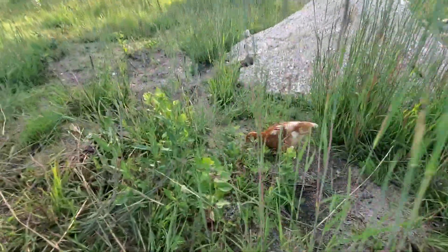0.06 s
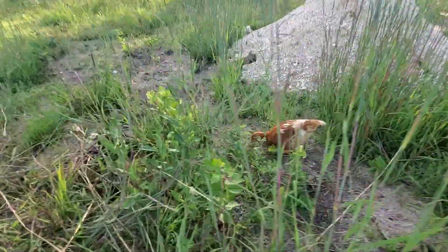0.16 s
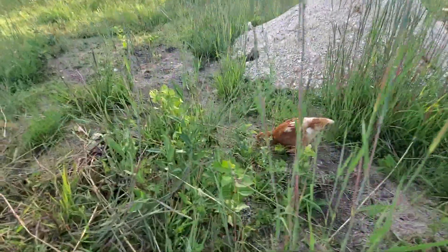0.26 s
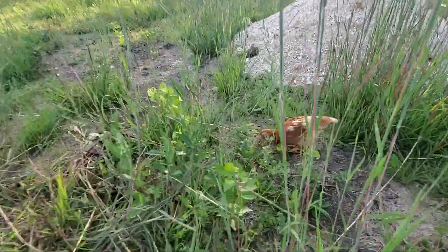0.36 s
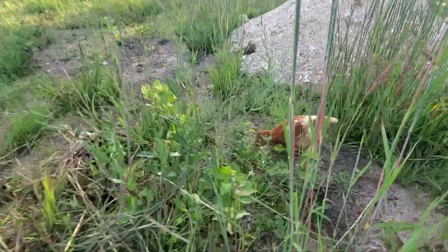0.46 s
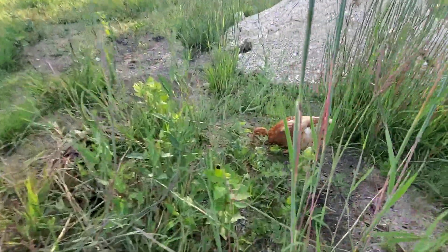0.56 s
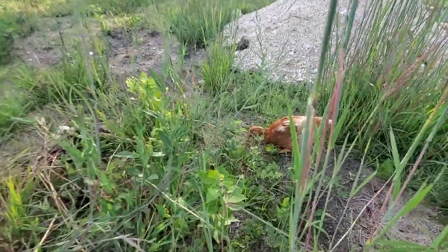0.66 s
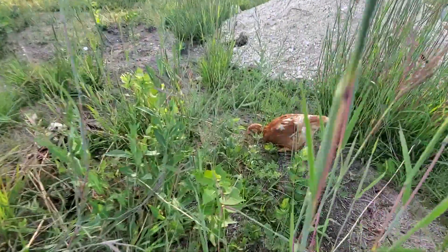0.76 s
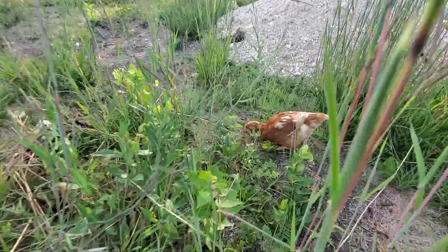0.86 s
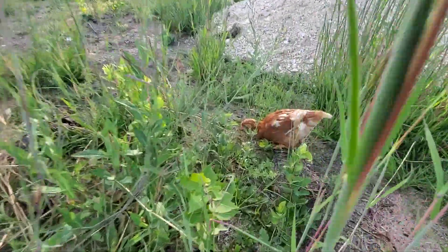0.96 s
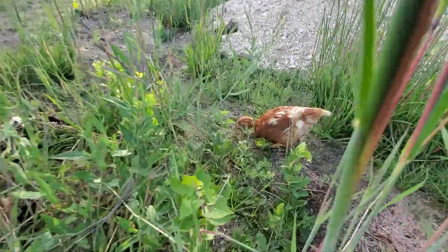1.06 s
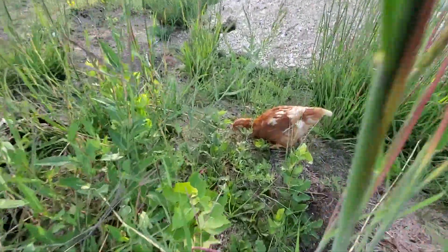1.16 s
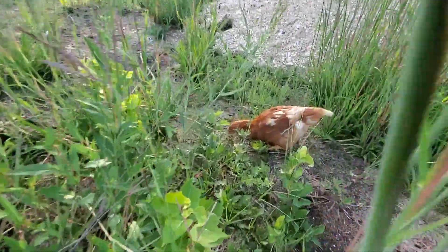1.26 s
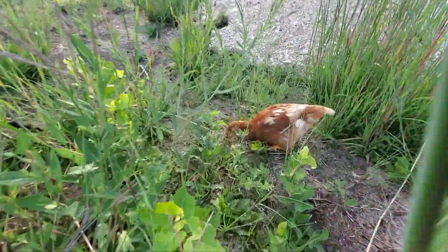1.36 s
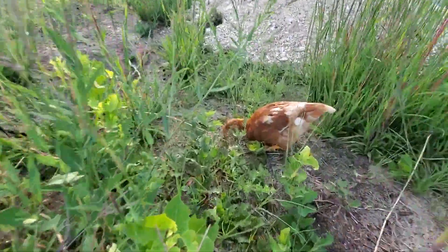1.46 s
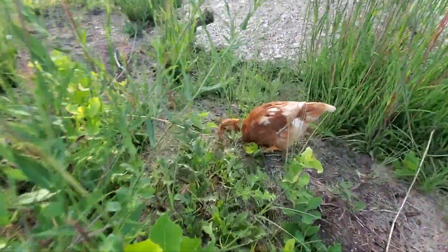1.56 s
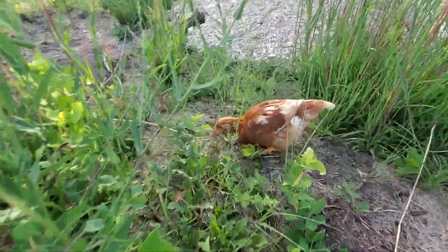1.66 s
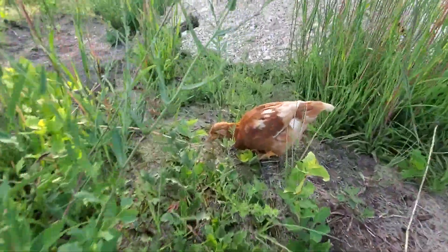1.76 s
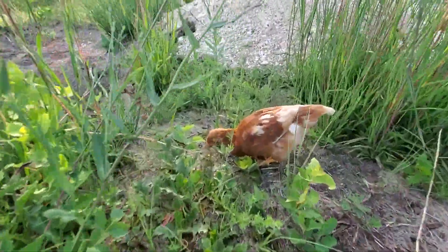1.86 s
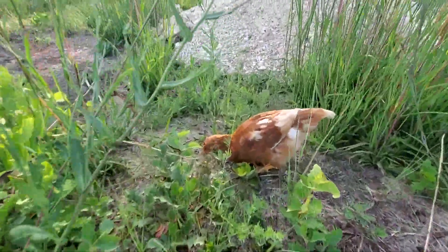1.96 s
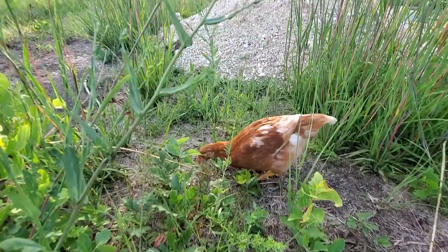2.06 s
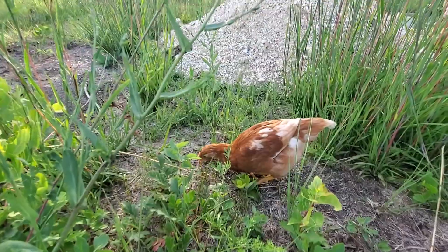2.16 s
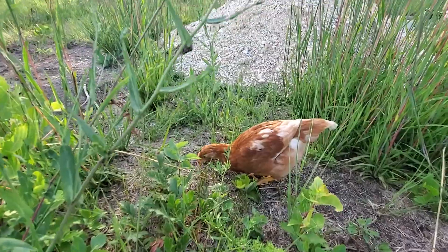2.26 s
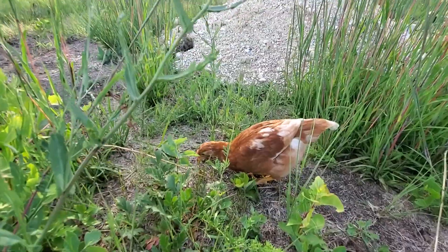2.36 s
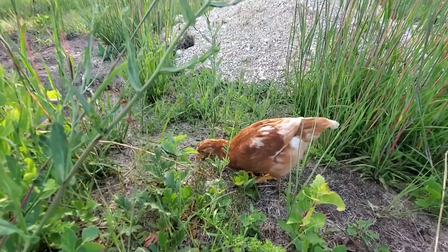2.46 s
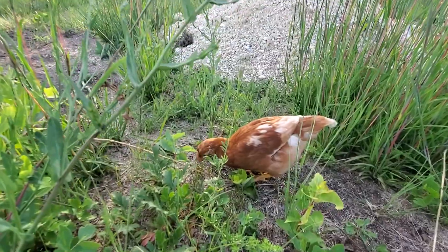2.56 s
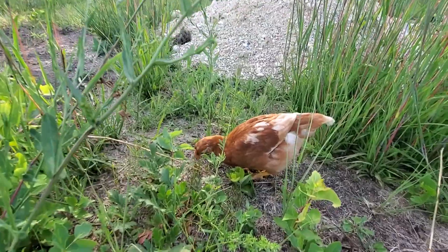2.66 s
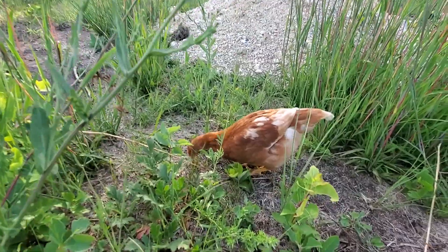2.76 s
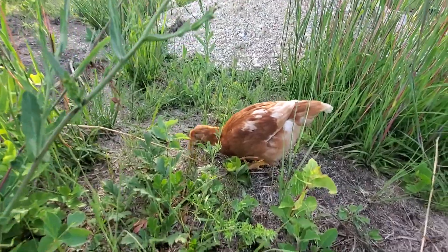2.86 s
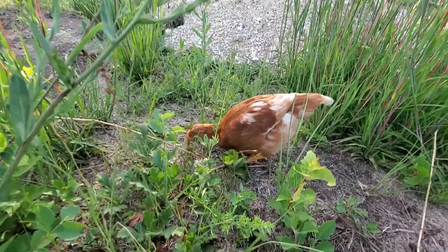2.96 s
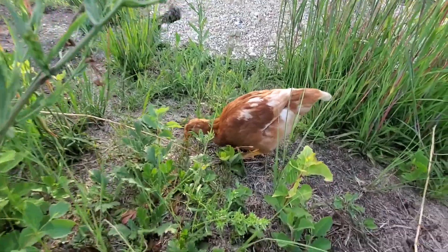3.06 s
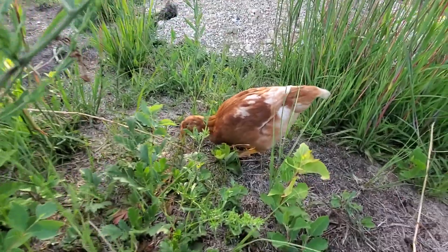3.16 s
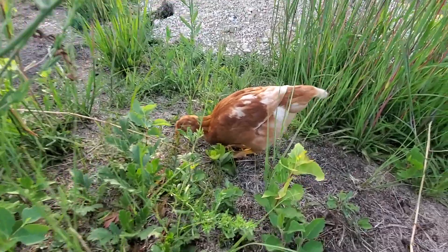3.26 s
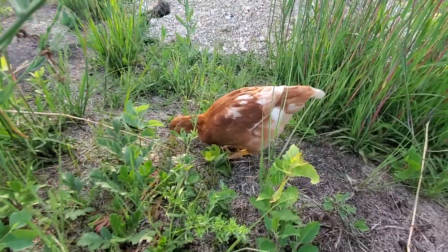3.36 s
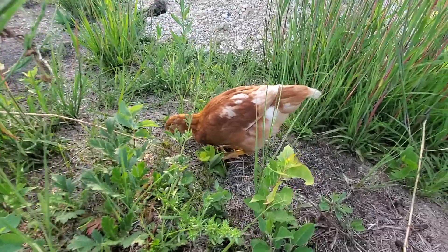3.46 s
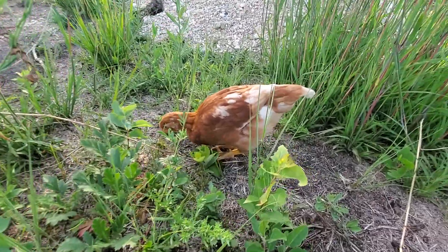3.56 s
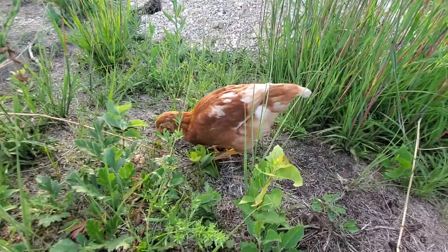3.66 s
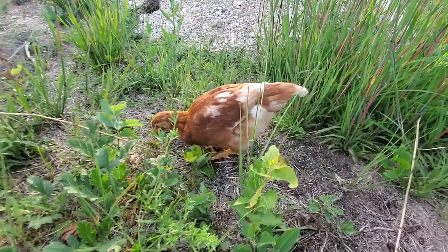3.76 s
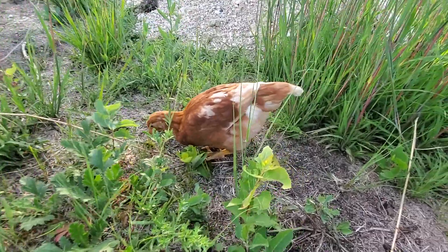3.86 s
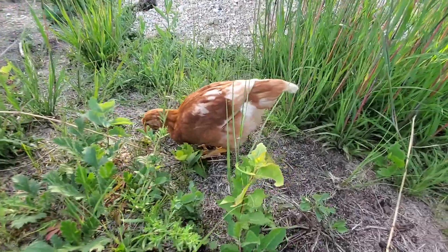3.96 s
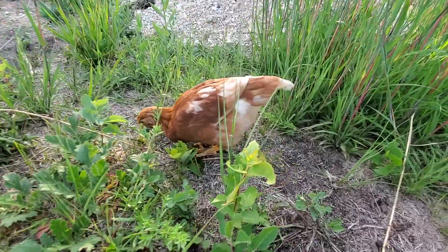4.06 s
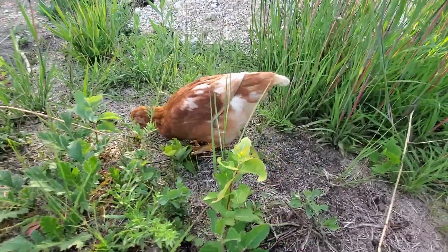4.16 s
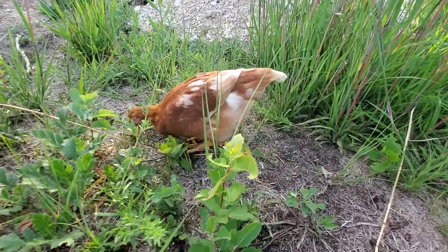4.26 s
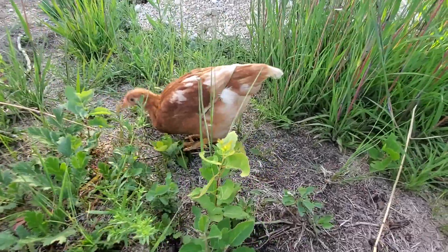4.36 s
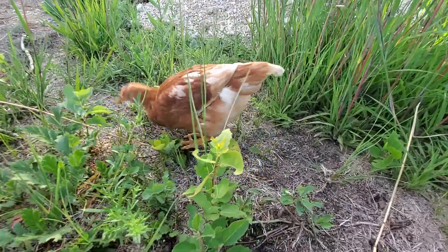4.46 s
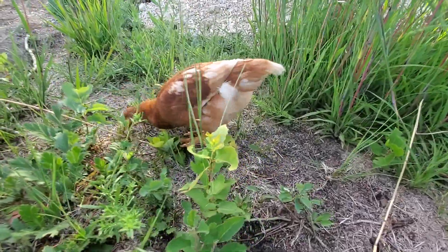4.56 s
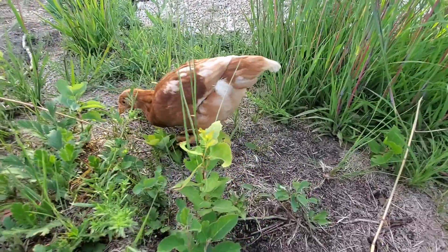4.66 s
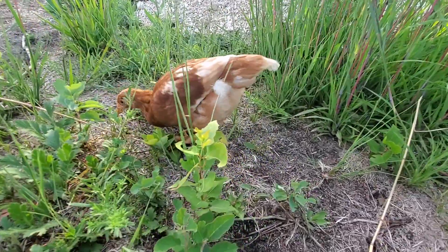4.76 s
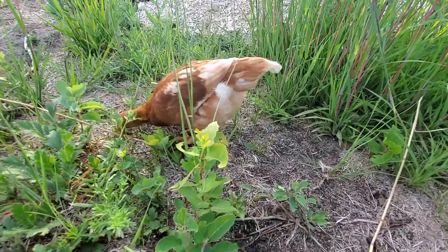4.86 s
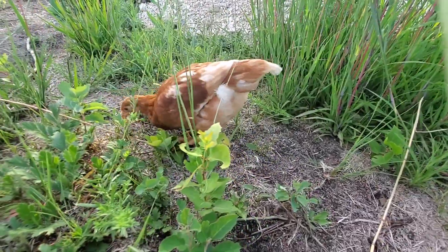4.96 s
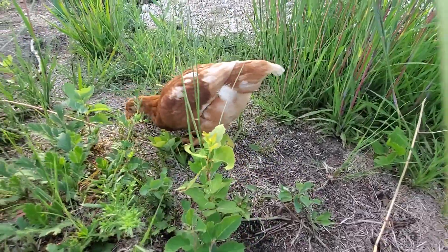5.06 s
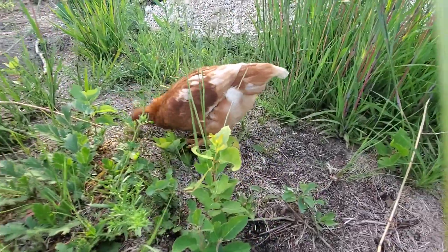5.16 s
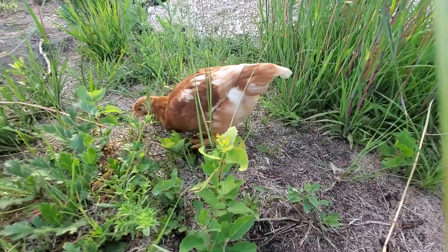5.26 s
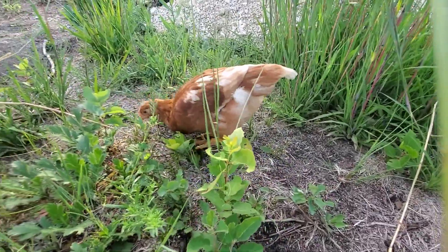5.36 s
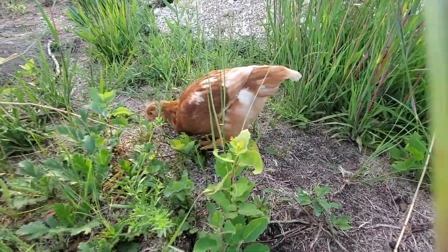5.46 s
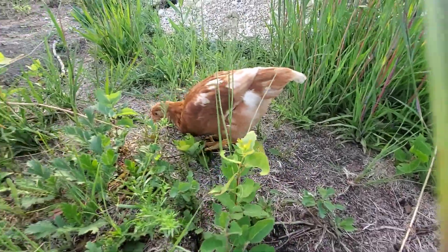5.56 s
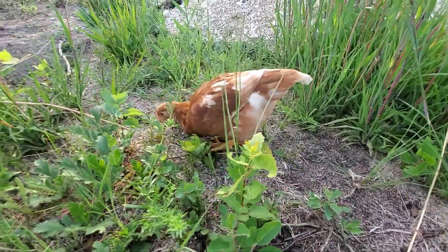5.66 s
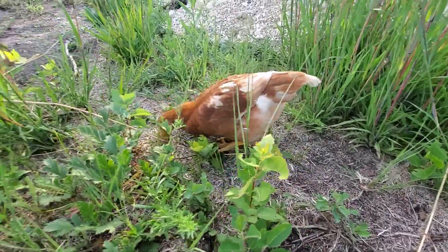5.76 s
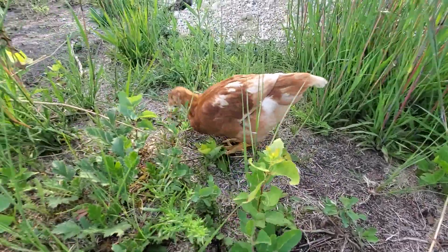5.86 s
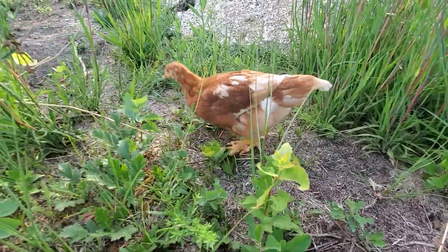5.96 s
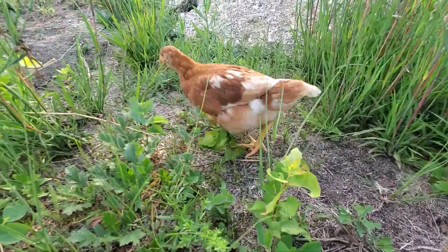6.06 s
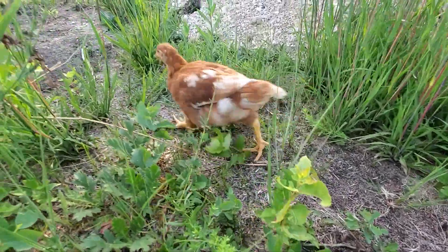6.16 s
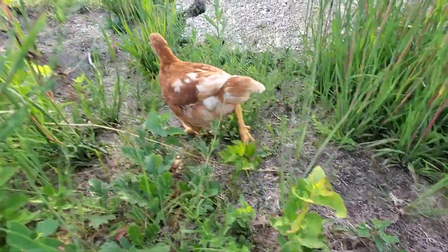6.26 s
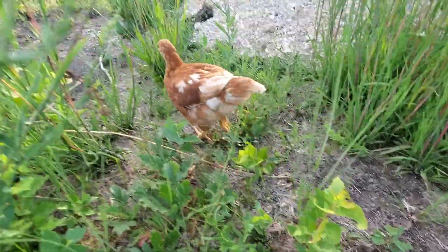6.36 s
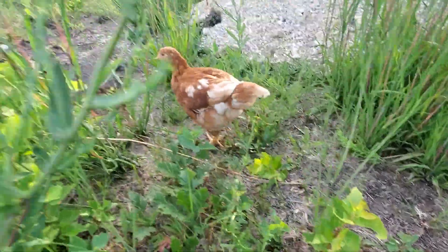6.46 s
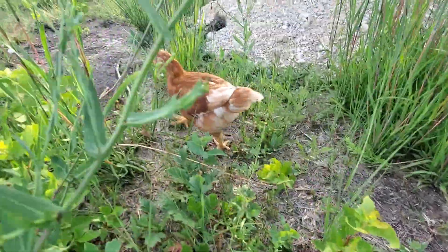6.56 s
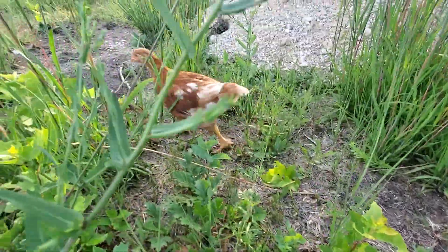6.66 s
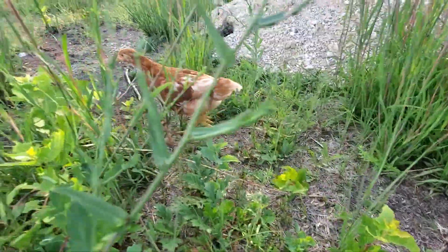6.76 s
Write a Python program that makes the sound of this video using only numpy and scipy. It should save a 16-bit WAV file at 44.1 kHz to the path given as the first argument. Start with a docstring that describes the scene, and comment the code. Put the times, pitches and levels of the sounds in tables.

```python
"""In tall grass, someone crouches and pushes along with a hand-held recorder, close behind a young hen.
Blades, leaf tips and stalks brush the right side of the case: hiss with crackles and scrapes, shaped in bands.
Dry stems snap (short bursts of noise) and stalks knock (brief low tones); the hen peeps (gliding sines) near the end.
The left port is half covered by the hand: quieter, hollow, with a hole in its treble."""
import sys
import numpy as np
from scipy import signal
from scipy.fft import rfft, irfft, next_fast_len
from scipy.io import wavfile

SR = 44100
rng = np.random.default_rng(int(sys.argv[2]) if len(sys.argv) > 2 else 0)


def bounce(signal):
    """Save signal as a 16-bit WAV file at the path given by the first command-line argument."""
    frames = np.transpose(np.atleast_2d(signal))
    limited = np.clip(frames, -1, 1)
    pcm = np.round(limited * 32767).astype(np.int16)
    wavfile.write(sys.argv[1], SR, pcm)


N = 301193   # length in samples
STEP = 40    # slow curves have one value per 40 samples


def from_db(db):
    """Turns a level in dB into a gain."""
    return 10 ** (np.asarray(db) / 20)


def rms_one(x):
    """Scales a sound to an rms of 1."""
    return x / np.sqrt(np.mean(x ** 2) + 1e-20)


def at_hz(points, hz):
    """Reads a curve of (f/Hz, level/dB) points, joined by straight lines over log frequency."""
    points_hz, points_db = np.array(points).T
    return np.interp(np.log(hz), np.log(points_hz), points_db)


def drift(rate_hz):
    """A slow random wander with an rms of 1: noise smoothed by two equal low-pass poles."""
    r = np.exp(-2 * np.pi * rate_hz * STEP / SR)
    warm_up = 1000
    noise = rng.standard_normal(N // STEP + 2 + warm_up)
    return rms_one(signal.lfilter([1], [1, -2 * r, r * r], noise)[warm_up:])


def stretch(coarse):
    """Joins up the values of a slow curve to give one per sample."""
    return np.interp(np.arange(N) / STEP, np.arange(len(coarse)), coarse)


def add(out, s, sound, left_db):
    """Lays a sound down at time s in both ports, with its own level on the left."""
    i = round(s * SR)
    out[:, i:i + len(sound)] += np.outer(from_db([left_db, 0]), sound[:N - i])


def peeps(left_db=-5.0):
    """The hen's peeps: thin whistles, each a sine whose pitch and level glide from point to point."""
    # one list of points per peep: t/s, f/Hz, level/dB
    peep_points = [
        [(5.99, 2820, -68), (6.005, 2680, -67), (6.03, 2550, -60)],
        [(6.19, 2800, -64), (6.198, 3400, -52), (6.205, 3900, -62)],
        [(6.245, 3450, -79), (6.265, 2850, -59), (6.29, 2510, -56), (6.33, 2360, -54), (6.36, 2170, -60),
         (6.39, 1720, -62)],
    ]
    out = np.zeros((2, N))
    for points in peep_points:
        s, hz, db = np.transpose(points)
        t = np.arange(s[0], s[-1], 1 / SR)
        phase = 2 * np.pi * np.cumsum(np.interp(t, s, hz)) / SR
        tone = np.sin(phase) * signal.windows.tukey(len(t), .15)   # soft start and end
        add(out, s[0], from_db(np.interp(t, s, db)) * tone, left_db)
    return out


def knocks(dryness=0.25):
    """Stalks knock on the case: a soft blow makes one low mode ring briefly, with a dull puff on top."""
    # each knock: t/s, peak level/dB, f/Hz, left level/dB relative to right
    knock_list = [(.139, -36.5, 388, -1.5), (0.48, -34, 1370, -9), (.69, -35.5, 580, -7),
                  (.765, -30.5, 890, -7.5), (0.779, -28, 536, -21), (.838, -29.5, 88, -15),
                  (0.903, -24.5, 213, -24), (0.913, -30.5, 86, -18), (1.104, -33.5, 81, -35),
                  (1.17, -34, 350, -5.5), (1.238, -38, 506, -10), (1.834, -28.5, 586, -28),
                  (1.872, -26, 149, -29), (3.19, -38, 605, 0), (3.75, -40, 546, -24),
                  (3.829, -41.5, 340, -18), (4.225, -46, 560, -10), (5.126, -50, 330, -14),
                  (5.735, -44, 730, -25), (6.387, -36, 191, -29), (6.563, -38, 270, -28)]
    t60_s, shortens = 0.016, 0.96   # time to fall 60 dB at 400 Hz; power by which higher knocks die sooner
    puff_fade_s = 0.0016
    out, t = np.zeros((2, N)), np.arange(6000) / SR
    puffs = signal.lfilter([1], [1, -.85], rng.standard_normal((len(knock_list), 6000)))
    for (s, db, hz, left_db), puff in zip(knock_list, puffs):
        ring = np.sin(2 * np.pi * hz * t) * (1 - np.exp(-4.0 * hz * t))
        blow = ring + dryness * rms_one(puff) * np.exp(-t / puff_fade_s)
        sound = blow * from_db(-60 * t / (t60_s * (400 / hz) ** shortens))
        add(out, s, from_db(db) * sound / abs(sound).max(), left_db)
    return out


def snaps(ring_share=0.49):
    """Dry stems snap: a short burst of uneven noise, partly coloured by a broad ring of the stem."""
    # each snap: t/s, peak level/dB, ring f/Hz, length/ms, left level/dB relative to right
    snap_list = [(0.2823, -25, 13600, 1, -26), (0.448, -30, 13100, 23, -24), (0.476, -29, 12700, 1.6, -24),
                 (0.601, -21, 11300, 1.7, -24), (0.6513, -24.5, 7200, 2.5, -22),
                 (0.737, -21.5, 11500, 1.6, -26), (0.7477, -25, 12700, 1.9, -26),
                 (0.765, -33, 2100, 2.1, -14), (0.7798, -15, 12700, 3.6, -28), (0.785, -19, 12500, 1.7, -9),
                 (0.8124, -10, 12700, 1.8, -32), (0.816, -9, 12500, 1, -32), (0.818, -17, 3100, 1.2, -30),
                 (0.873, -33, 3200, 1.4, 4), (0.9093, -12.5, 2380, 0.95, -22), (0.9329, -20, 1800, 8, -30),
                 (0.946, -11, 4630, 8.9, -26), (0.961, -22, 7060, 1.7, -34), (1.7207, -20, 10900, 1.2, -30),
                 (1.821, -19, 13500, 21, -34), (2.1196, -33, 5900, 3.5, -26), (2.486, -31.5, 6160, 25, -14),
                 (2.793, -30, 6030, 6.7, -30), (2.9813, -21, 14000, 1.5, -30),
                 (3.028, -24.5, 10200, 3.6, -34), (3.073, -28, 4700, 2.8, -30),
                 (3.115, -28.5, 10800, 2.1, -30), (3.137, -28.5, 7300, 4.3, -32), (3.19, -28, 6460, 2, -30),
                 (3.5173, -43, 7000, 7.6, -27), (3.5499, -43.5, 4000, 3.3, -14),
                 (3.6822, -38, 7200, 0.87, -26), (3.7033, -40, 7100, 2.1, -26),
                 (3.7256, -40, 7140, 1.4, -26), (3.754, -32.5, 7660, 1.3, -38),
                 (3.8302, -44, 1800, 3.6, -26), (4.094, -37, 4800, 14, -30), (4.115, -34, 4450, 5.2, -28),
                 (4.5616, -29, 7000, 2.5, -33), (4.5826, -35.5, 9900, 25, -13),
                 (4.673, -36.5, 6300, 4.4, -23), (4.9307, -28, 3600, 1.6, -6),
                 (5.1633, -35, 7460, 2.5, -22), (5.2036, -41, 12700, 16, -8),
                 (5.2442, -34.5, 5940, 7.2, -14), (5.325, -40.5, 7500, 6.6, -24),
                 (5.356, -38.5, 5860, 5.7, -17.5), (5.4736, -43, 5900, 6.2, -14),
                 (5.5066, -32.5, 5900, 9.4, -13), (5.68, -35, 11200, 2.2, -15), (5.929, -49, 5000, 1.3, 6),
                 (5.939, -37, 11000, 4.4, -20), (6.1585, -25.5, 7440, 4.9, -14),
                 (6.1871, -25.5, 3960, 1.3, -26), (6.2735, -36, 2780, 5.1, -26),
                 (6.3869, -23.5, 12500, 12.3, -34), (6.4, -22, 11200, 8, -34),
                 (6.4084, -21, 3850, 2.6, -32), (6.5284, -26, 6300, 1.4, -30),
                 (6.669, -24, 6500, 0.83, -34), (6.6884, -23.5, 4200, 1.4, -34),
                 (6.7033, -24, 1900, 1.8, -34), (6.718, -33, 4200, 1.8, -34), (6.7355, -22.5, 3820, 2, -34),
                 (6.75, -24, 2530, 1.1, -34), (6.767, -26, 3670, 5.2, -36), (6.7856, -21, 15100, 1.5, -34)]
    out, t = np.zeros((2, N)), np.arange(900) / SR
    shape = (len(snap_list), 900)
    fibres = rng.standard_normal(shape) * from_db(5.34 * rng.standard_normal(shape))
    for (s, db, hz, ms, left_db), noise in zip(snap_list, fibres):
        age = t / (max(ms, .3) / 1000)   # in lengths of the snap
        burst = noise * (1 - np.exp(-8.0 * age)) * np.exp(-3.0 * age)
        ring = signal.lfilter(*signal.iirpeak(min(hz, 15500), 2.5, fs=SR), burst)
        broad = signal.lfilter(*signal.butter(1, 900, "high", fs=SR), burst)
        sound = ring_share * rms_one(ring) + (1 - ring_share) * rms_one(broad)
        add(out, s, from_db(db) * sound / abs(sound).max(), left_db)
    return out


def sparse(per_s, spread_db):
    """Random one-sample clicks of uneven size, pointing up or down."""
    sizes = from_db(spread_db * np.minimum(rng.exponential(1, N), 4.0)) * rng.choice([-1, 1], N)
    return sizes * (rng.random(N) < per_s / SR)


def scrapes(per_s=500, cycles=8.4):
    """Single stems catch and ring for a few cycles, each dealt one of 14 pitches."""
    clicks = sparse(per_s, spread_db=3.2)
    dealt, out = rng.integers(0, 14, N), 0
    for k, hz in enumerate(np.geomspace(300, 6000, 14)):
        r = from_db(-60 * hz / (cycles * SR))   # falls 60 dB in the given cycles
        w = 2 * np.pi * hz / SR
        mine = clicks * (dealt == k) + 1e-18
        ring = signal.lfilter([0, np.sin(w)], [1, -2 * r * np.cos(w), r * r], mine)
        out = out + hz / SR * ring
    return rms_one(out)


def rubbing(clumpy_db, crackle_db, scrape_db=-13.5):
    """Friction: two unrelated hisses with the same tiny crackles and scrapes, all arriving in clumps."""
    crackles = from_db(crackle_db) * rms_one(sparse(per_s=700, spread_db=9))
    clumps = from_db(clumpy_db * stretch(0.69 * drift(34) + drift(68)))
    hiss = rng.standard_normal((2, N)) * np.sqrt(clumps)   # hiss swells less than the rest
    return hiss + (crackles + from_db(scrape_db) * scrapes()) * clumps


def contact():
    """Slow dB curves of how hard case, stalks, blades and tips rub; then left body and treble against right."""
    # steady brushing: t/s, blades level/dB, then levels/dB relative to blades: tips, stalks, left port
    brush = [(0.0, -60, 10, 18, -6.5), (0.1, -50, 6, 6.5, -10), (0.27, -58, 2, 5.5, -6),
             (0.3, -63, 4, 3.5, -10), (0.42, -60, 2, -1, -11.5), (0.66, -53.5, 4.5, 1.5, -7),
             (1.0, -50.5, 1, -2, -13), (1.14, -63, 4.5, 1, -5), (1.28, -49, 5, 1.5, -3),
             (1.6, -51, 0, -5, -5), (1.95, -49, 5.5, 8, -16.5), (2.07, -60.5, 2, 4, -9.5),
             (2.47, -56, -8, -2.5, -7.5), (2.66, -76, -2, 7.5, -8.5), (2.75, -70, 10.5, 6, -9),
             (2.8, -55, -7, -2, -18.5), (3.25, -61, -2, 9, -10.5), (3.33, -66.5, -3.5, -1, -11.5),
             (3.67, -74.5, 4, 5, -4), (3.8, -63.5, -4.5, 2, -11), (5.0, -64.5, -3, -2, -9.5),
             (5.1, -72.5, -11, 0, -9), (5.42, -84, -2, -4, -1), (5.56, -69.5, -6, -3.5, -8),
             (5.97, -66.5, -6.5, -2.5, -9.5), (6.2, -54, 2, -3.5, -10), (6.6, -53, -2.5, 2, -17.5),
             (6.83, -56.5, -3, 7, -28)]
    # single blades swishing past: peak t/s, blades level/dB, length/ms,
    # then levels/dB relative to blades: tips, stalks, left port
    swishes = [(0.781, -47, 21, -20, 5, -7), (0.818, -32.5, 38, -16, 1, -14),
               (0.868, -46.5, 48, -21, -3, -3), (0.911, -46, 20, 8, 13, -1),
               (0.957, -28.5, 75, -2, -2.5, -15.5), (1.06, -45.5, 270, -20, -25, -1),
               (1.489, -36.5, 280, -9, 3, -7), (1.672, -46, 136, -12, 7, -4), (1.82, -50, 160, 9.5, 3, -12),
               (1.881, -53, 66, -13, 14.5, -23), (2.221, -54, 550, 2, -14, -14),
               (2.419, -50, 210, -5, -4.5, -15), (2.85, -52, 170, -4, 4, -12),
               (2.929, -47.5, 140, -2, 1, -11), (2.991, -52.5, 120, 7, 4, -11),
               (3.049, -63, 73, 8, 15.5, 0), (3.19, -56.5, 120, 5, 2, -22), (3.76, -64, 120, 4, -15.5, -17),
               (4.1, -79, 48, 13, -12, -12), (4.231, -54, 41, -26, -7, -8),
               (4.342, -55.5, 300, -3.5, 3, -10), (4.78, -54, 225, -6, -0.5, -12),
               (4.931, -49, 110, -12, -1.5, -14), (5.141, -60, 83, -9, -5, -9),
               (5.25, -62, 180, -3, -8, -8), (5.36, -73.5, 200, 0, 5, -8), (5.511, -60, 45, -20, -17, -2),
               (5.69, -61.5, 290, -7, -11, -11), (5.87, -62.5, 130, 1.5, -1, -8),
               (6.08, -61, 95, 14.5, -20, -16), (6.402, -46.5, 90, 5.5, -2, -10),
               (6.68, -44.5, 134, -6.5, -1, -30), (6.75, -48.5, 220, -8, 2, -30)]
    # low shaking of the case: t/s, level/dB
    shaking = [(0.0, -59.5), (0.38, -69), (0.77, -60.5), (0.83, -49), (0.94, -35), (1.06, -47),
               (1.14, -58.5), (1.5, -44), (1.58, -52), (1.67, -39), (1.88, -40), (1.93, -48), (2.07, -63),
               (2.42, -59), (2.66, -77), (2.73, -56), (2.93, -58), (3.23, -58.5), (3.33, -73), (3.8, -62),
               (4.34, -56.5), (4.75, -75), (4.96, -53.5), (5.08, -65.5), (5.42, -75.5), (6.06, -68.5),
               (6.28, -51.5), (6.62, -54), (6.83, -57)]
    # treble at the left port, which hears grass further off: t/s, level/dB
    treble_left = [(0, -70), (0.1, -59), (0.38, -80), (0.66, -65), (1.14, -71), (1.3, -59.5), (1.52, -49.5),
                   (1.73, -68), (2.42, -80), (2.66, -88), (2.85, -79), (3.22, -82), (3.33, -88),
                   (4.17, -87), (4.34, -76), (4.55, -73), (4.88, -82), (4.94, -51), (5.0, -88), (5.25, -72),
                   (5.42, -91), (5.7, -84.5), (6.1, -72), (6.4, -78), (6.83, -74)]
    rise, fade_db = 0.53, 18.5   # share of a swish spent rising; drop at both ends of its length

    grid = np.arange(N // STEP + 2) * STEP / SR   # seconds
    s, *columns = np.transpose(brush)
    blades, tips, stalks, left = [np.interp(grid, s, c) for c in columns]
    power = from_db(2 * np.array([blades + stalks, blades, blades + tips, blades + left]))
    for peak_s, db, ms, tips_db, stalks_db, left_db in swishes:
        age = (grid - peak_s) / (ms / 1000)   # in lengths of the swish
        swell = db - fade_db * np.maximum(-age / rise, age / (1 - rise))
        power += from_db(2 * (swell + np.array([[stalks_db], [0], [tips_db], [left_db]])))
    stalks, blades, tips, left = 10 * np.log10(power)

    case = np.interp(grid, *np.transpose(shaking))
    left_treble = np.interp(grid, *np.transpose(treble_left)) - tips
    return np.array([case, stalks, blades, tips]), left - blades, left_treble


def brushing(patchy_db):
    """Grass brushing the case: rubbing split into narrow bands, each following the parts nearest in pitch."""
    # where each rubbing part is heard, f/Hz: case, stalks, blades, tips
    parts_hz = (130, 850, 3200, 11000)
    # colour of the rubbing: f/Hz, level/dB per Hz relative to the level of the nearest part
    colour = [(25, -44), (50, -26), (85, -19.5), (130, -27), (220, -29.5), (400, -30.5), (1000, -37),
              (1800, -35.5), (4500, -36.5), (7000, -36), (12000, -38.5), (15500, -39)]
    shared = 0.2   # gain of the right side's rubbing in the left
    parts, left_body, left_treble = contact()
    right = rubbing(clumpy_db=3.0, crackle_db=-7.5)
    left = shared * right + rubbing(clumpy_db=0.4, crackle_db=-17.0)
    out, edges = np.zeros((2, N)), np.geomspace(25, 18000, 32)   # Hz
    for k, (low, high) in enumerate(zip(edges, edges[1:])):
        hz = np.sqrt(low * high)
        shares = [np.interp(np.log(hz), np.log(parts_hz), row) for row in np.eye(4)]
        level_db = shares @ parts + at_hz(colour, hz)
        left_db = shares[3] * left_treble + (1 - shares[3]) * left_body
        sos = signal.butter(2, [low, high], "band", fs=SR, output="sos")
        # neighbouring bands take unrelated hiss
        left_band, right_band = signal.sosfilt(sos, [left[k % 2], right[k % 2]])
        out[0] += left_band * stretch(from_db(level_db + left_db + patchy_db * drift(15.0)))
        out[1] += right_band * stretch(from_db(level_db + patchy_db * drift(13.3)))
    return out * np.sqrt(SR / 2)   # brings noise of rms 1 to 0 dB per Hz


def scene():
    """Adds up everything that reaches the two ports."""
    return brushing(patchy_db=3.0) + knocks() + peeps() + snaps()


def record(dry):
    """Each port colours what it hears, then two steep low-pass filters cut the top."""
    # what the hand lets through to the left port: f/Hz, level/dB
    covered_port = [(40, -7), (200, -1.5), (400, 0.5), (620, 9), (1000, 2), (2000, 0), (2700, 1.5),
                    (3400, 8.5), (4200, -1.5), (6000, -4), (7600, -22), (8300, 0), (10500, 2), (15000, 5)]
    # the open right port, with a dip in its treble: f/Hz, level/dB
    open_port = [(6500, 1), (7600, 2), (8200, -6), (9000, -3.5), (10500, 0.5), (12000, 2)]
    size = next_fast_len(N + 4096)
    hz = np.maximum(np.arange(size // 2 + 1) * SR / size, 1)
    ports = from_db([at_hz(covered_port, hz), at_hz(open_port, hz)])
    heard = irfft(rfft(dry, size) * ports, size)[:, :N]
    heard = signal.sosfilt(signal.cheby2(8, 50, 16800, fs=SR, output="sos"), heard)
    return signal.sosfilt(signal.ellip(8, .5, 40, 15950, fs=SR, output="sos"), heard)


dry = scene()
out = record(dry)
bounce(out)
```